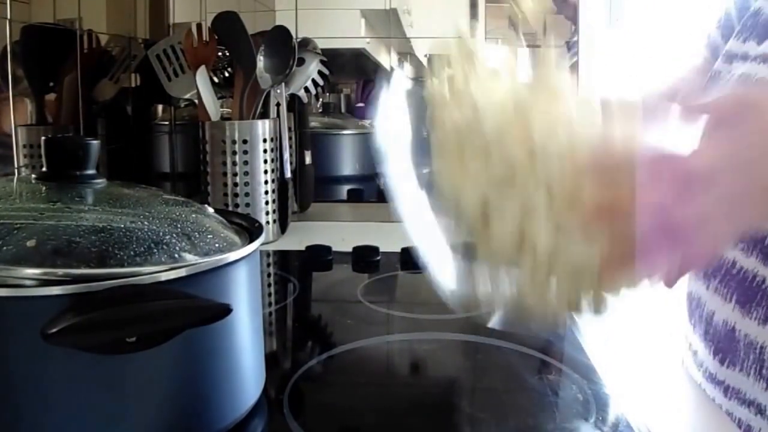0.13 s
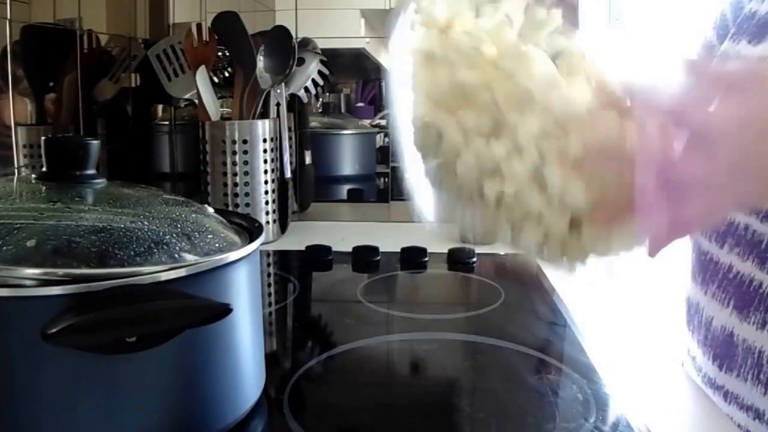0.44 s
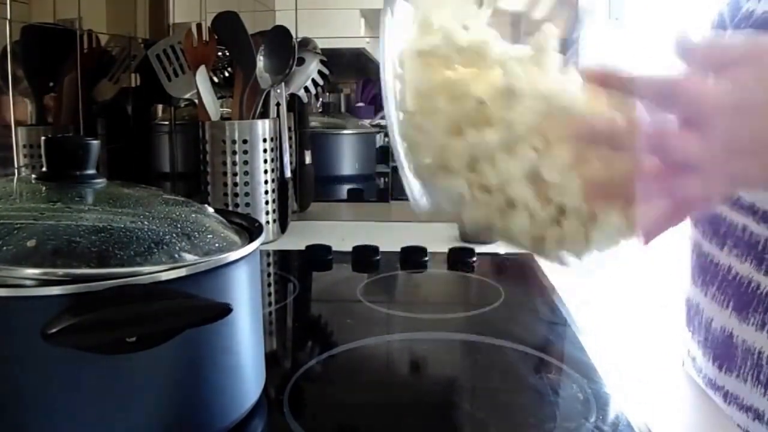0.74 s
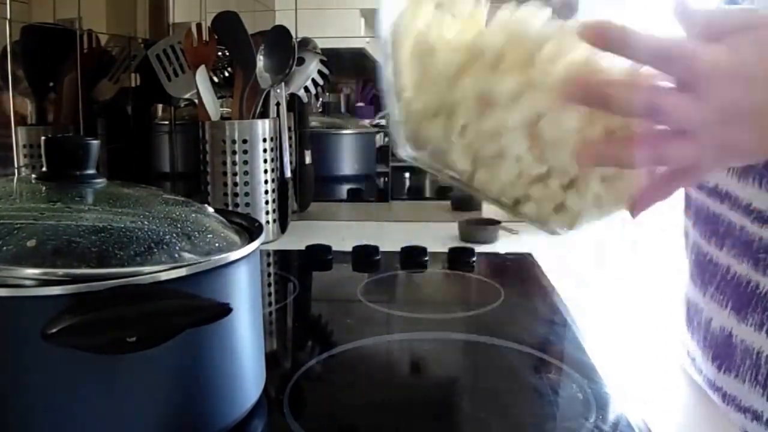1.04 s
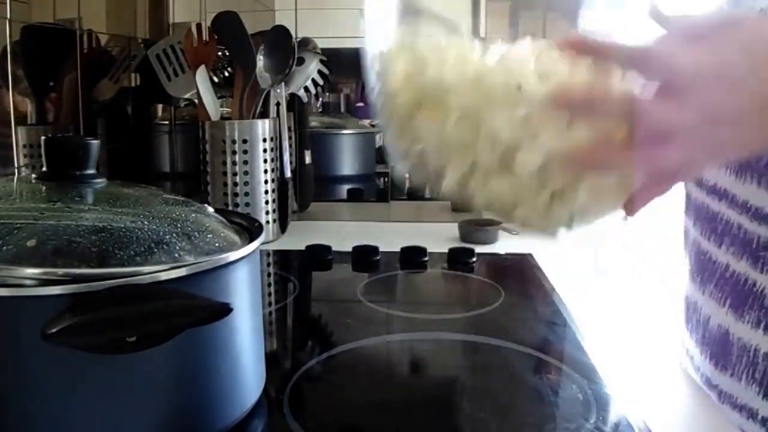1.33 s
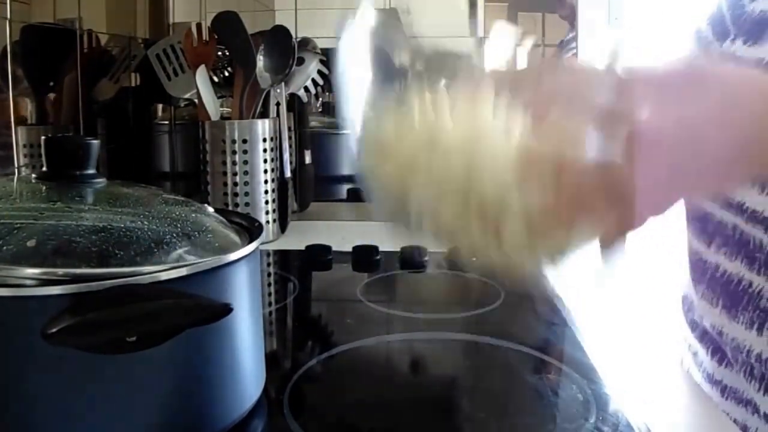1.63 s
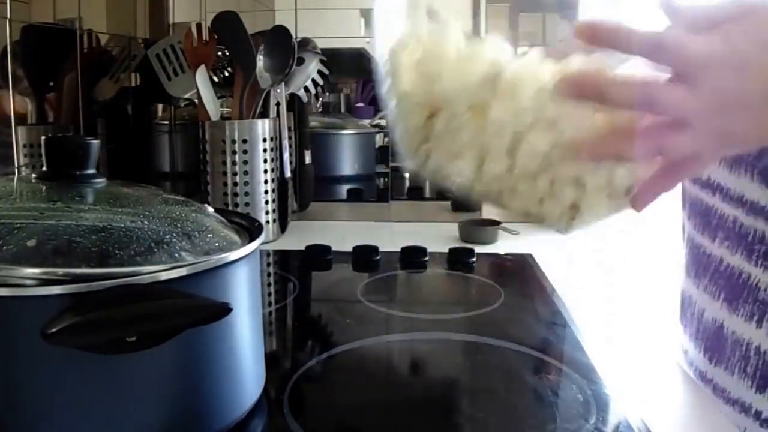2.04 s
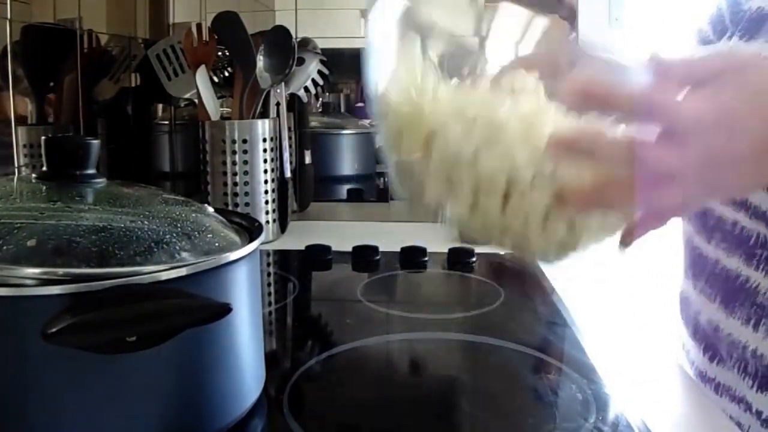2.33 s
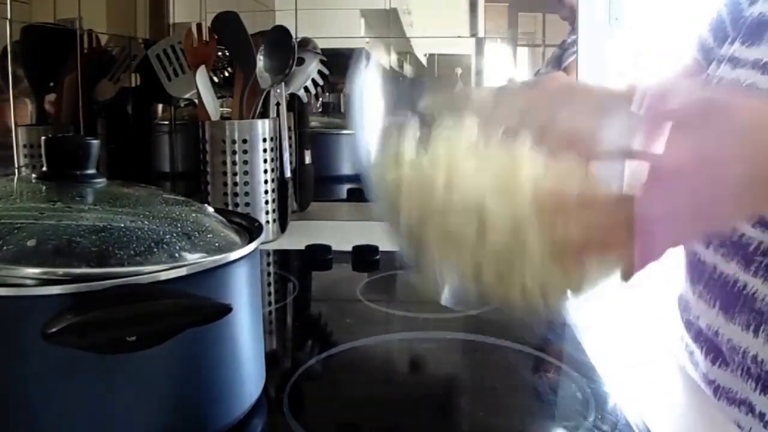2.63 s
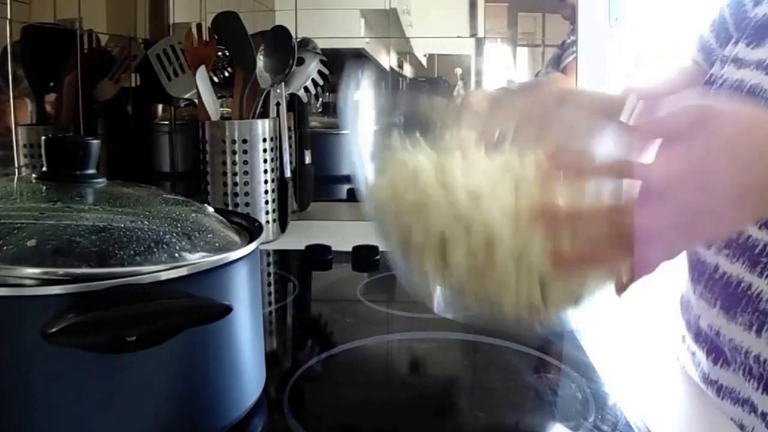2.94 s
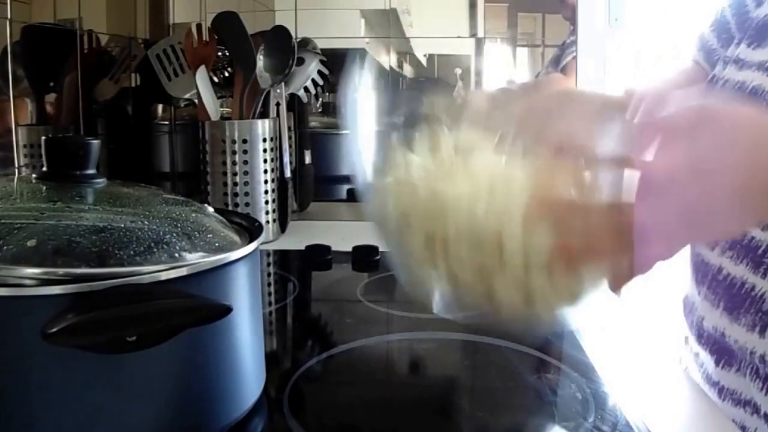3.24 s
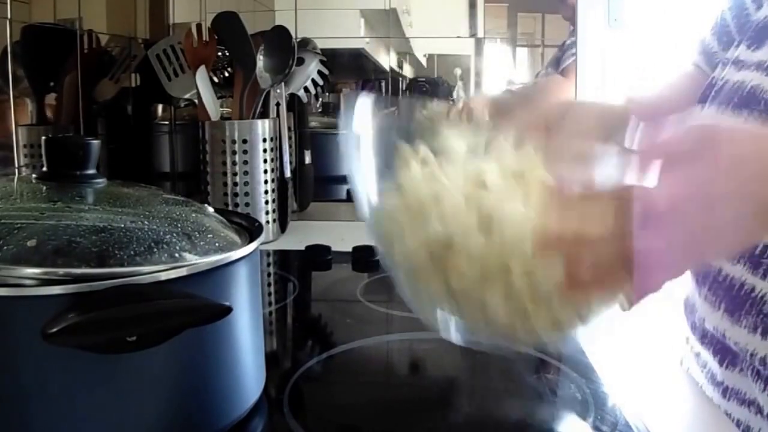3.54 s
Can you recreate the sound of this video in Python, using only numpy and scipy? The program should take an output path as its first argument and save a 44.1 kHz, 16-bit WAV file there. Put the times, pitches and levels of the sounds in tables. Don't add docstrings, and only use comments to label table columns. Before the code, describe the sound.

Popcorn is tossed in a large glass bowl, about every 0.33 s from 0.1 s to the end near 3.7 s. Each bright, grainy swish swells quickly and fades, with a duller heap landing just behind. Hard kernels clink sharply, strongest around 0.14, 0.52 and 1.18 s; dry ticks near 0.4 s. Swishes soften after 1.4 s, then recover somewhat around 3 s. Close, short kitchen echo, faint hum.

```python
import sys
import numpy as np
from scipy import signal
from scipy.fft import rfft, irfft
from scipy.io import wavfile

SR = 44100
rng = np.random.default_rng(int(sys.argv[2]) if len(sys.argv) > 2 else 0)


def ratio(d):
    e = np.asarray(d, float) / 20
    return 10 ** e


def bounce(signal):
    frames = np.transpose(np.atleast_2d(signal))
    limited = np.clip(frames, -1, 1)
    pcm = np.round(limited * 32767).astype(np.int16)
    wavfile.write(sys.argv[1], SR, pcm)


N = 163170
T = np.arange(N) / SR

# (start [s], rise [s], rustle level [dB], fall [dB/s], glass rattle level [dB])
TOSSES = [(0.099, 0.078, -25, 126, -34), (0.448, 0.068, -24, 123.5, -29.5), (0.778, 0.058, -27, 125, -31),
          (1.101, 0.064, -25.5, 130, -48), (1.448, 0.041, -33.5, 114, -40),
          (1.79, 0.077, -28.5, 112.5, -50), (2.118, 0.064, -28.5, 137, -38), (2.43, 0.09, -31.5, 146, -36),
          (2.768, 0.091, -29, 156, -34), (3.08, 0.07, -26, 160, -35), (3.381, 0.076, -27.5, 140, -35),
          (3.66, 0.1, -33, 120, -30)]
# (time [s], level [dB])
TRICKLE = [
    (0.0, -32.5),
    (0.17, -40.5),
    (0.35, -33),
    (1.17, -37.5),
    (1.47, -38.5),
    (1.63, -41.5),
    (1.96, -55),
    (2.31, -40),
    (3.16, -47),
    (3.7, -39),
]
# (frequency [Hz], density [dB/Hz])
RUSTLE_SPECTRUM = [(710, -18), (1200, -10.5), (1710, -7), (1850, -6.5), (2920, -9), (3590, -8), (4150, -8),
                   (14200, -6)]
# (frequency [Hz], density [dB/Hz])
SETTLE_SPECTRUM = [(1290, -35), (2200, -13), (2610, -13), (3510, -9), (4570, -9.5), (7690, -2),
                   (14100, -4.5)]
# (frequency [Hz], density [dB/Hz])
HEAP_SPECTRUM = [(180, -49), (300, -4.5), (560, -5.5), (793, -9), (1140, -1), (1480, -9.5), (1700, -1),
                 (2210, -27), (3740, -120)]
# (frequency [Hz], width [Hz], level [dB])
BOWL_CAVITY = [(470, 35, -7), (560, 70, -3), (1120, 80, -9)]
# (time [s], crack peak [dB], low pair [dB], middle modes [dB], upper pair [dB])
TAPS = [(0.1174, -17, -46, -40, -41), (0.1356, -9, -23.5, -20.5, -21), (0.1576, -20, -49, -20, -41),
        (0.2214, -15.5, -31.5, -32.5, -26), (0.4861, -24, -27, -40, -28), (0.5222, -6, -30, -17.5, -16.5),
        (0.7916, -16, -38, -43, -32), (0.8194, -16, -29, -34, -30), (0.847, -9.5, -50, -25, -22.5),
        (1.1074, -31, -36, -46, -54), (1.1238, -10.5, -32.5, -25, -37), (1.1498, -17, -23, -42, -30),
        (1.1752, -4, -60, -26.5, -24), (1.1994, -9, -29, -24, -27), (1.4745, -27, -41, -48, -45),
        (1.8108, -18.5, -34, -46, -39), (1.8494, -20, -34, -39, -36), (1.9334, -20, -40.5, -45, -22.5),
        (2.1605, -22, -36, -55.5, -42), (2.2694, -44, -38, -59, -53), (2.4914, -27, -37, -49, -51),
        (2.8115, -15.5, -36.5, -43, -28.5), (3.1188, -32, -32, -54, -48), (3.4331, -38, -55, -38, -52)]
# (frequency [Hz], level [dB], t60 [s])
LOW_MODES = [(1868, -13, .5), (1895, -9, .45), (1880, -3, .14), (1905, -4, .1), (1835, -9, .1),
             (1765, -16, .12), (1125, -19, .3)]
# (frequency [Hz], level [dB], t60 [s])
MIDDLE_MODES = [(3602, -7, .55), (3636, -10, .5), (3615, -2, .16), (3556, -10, .15)]
# (frequency [Hz], level [dB], t60 [s])
UPPER_MODES = [(4868, -17, .3), (4880, 0, .06), (4500, -5, .035), (4330, -8, .025)]
# (frequency [Hz], level [dB], t60 [s])
HIGH_MODES = [(6090, 2, .08), (6270, -1, .06), (6615, 2, .09), (6950, 0, .06), (7930, 1, .05),
              (9275, -3, .08), (9800, 0, .05), (10300, -1, .04), (12720, -3, .05)]
# (time [s], peak level [dB])
TICKS = [(0.3661, -18), (0.387, -5), (0.3954, -16), (0.4644, -19), (0.6644, -22), (0.7018, -19),
         (0.7692, -19), (0.9991, -21), (1.0194, -25), (1.0314, -22), (1.057, -20), (1.3808, -20),
         (1.4287, -22), (1.6531, -23)]
# (frequency [Hz], level [dB], t60 [s])
TICK_MODES = [(6100, -13, .003), (9400, -11, .004)]
# (frequency [Hz], density [dB/Hz])
HUM_SPECTRUM = [(12, -45), (20, -3), (549, -6), (967, -8), (1100, -4), (1300, -14.5), (1850, -8.5),
                (2190, -14.5), (3000, -19), (3900, -17), (6600, -120)]
# (frequency [Hz], width [Hz], level [dB])
HUM_TONES = [(96, 6.2, -74.5), (154, 6.9, -67.5), (213, 16, -77)]


def corn():
    level_db = np.transpose(TOSSES)[2]
    clumping = ratio(1.5 * drift(34.5))
    rustle = swell(0, level_db + 5) * clumping * colour(grains(9000, 1), RUSTLE_SPECTRUM)

    landing_lag_s, bowl_cut_hz = 0.0058, 430
    heap = colour(grains(3000, 2.6), HEAP_SPECTRUM)
    for hz, width_hz, db in BOWL_CAVITY:
        heap = heap + ratio(db) * peak(grains(3000, 2.7), hz, width_hz)
    heap = heap * swell(landing_lag_s, 0.77 * (level_db + 28) - 37, 0.9)
    heap = high(high(heap, bowl_cut_hz), bowl_cut_hz)

    trickle_db = np.interp(T, *np.transpose(TRICKLE)) - 3 + 0.81 * drift(17)
    trickle = ratio(trickle_db) * colour(grains(7000, 2.3), SETTLE_SPECTRUM)
    return rustle + heap + trickle


def glass():
    times, crack_db, low_db, middle_db, upper_db = np.transpose(TAPS)
    toss_db = np.transpose(TOSSES)[4]
    rattle_lead_s, earlier_ring_db = 0.024, -43.5
    soft = swell(-rattle_lead_s, (toss_db + 32) - 54.5, 1.69)
    hard = swell(-rattle_lead_s, 1.7 * (toss_db + 32) - 54.5, 1.69)
    # (modes, tap levels [dB], rattle level [dB], rattle gain over time)
    families = [(LOW_MODES, low_db + 3, -0.5, soft),
                (MIDDLE_MODES, middle_db - 1, -9.5, hard),
                (UPPER_MODES, upper_db - 1.5, -5, hard),
                (HIGH_MODES, 1.74 * crack_db + 6 - 21, -9, hard)]
    ringing = 0
    for modes, tap_db, rattle_db, rattle in families:
        for hz, mode_db, t60 in modes:
            uneven_db = rng.normal(0, 0.5, len(times))
            signs = rng.choice([-1, 1], len(times))
            strikes = at_times(times, ratio(tap_db + uneven_db) * signs)
            strikes[0] = ratio(earlier_ring_db + rattle_db)
            strikes = strikes + ratio(rattle_db) * rattle * grains(500, 2.5)
            damping = ratio(3.5 * drift(45))
            ringing = ringing + ratio(mode_db) * damping * ring(strikes, hz, t60)
    shimmer = fade(at_times(times, ratio(2 * crack_db - 23)), 0.061)
    ringing = ringing + shimmer * peak(rng.standard_normal(N), 6750, 1000)

    crack_s, crack_rise_s = 0.036, 0.0015
    burst = fade(at_times(times, ratio(1.15 * crack_db - 14)), crack_s)
    burst = fade(burst, crack_rise_s) / (crack_rise_s * SR)
    crack = burst * high(rng.standard_normal(N), 4900) * ratio(2.0 * drift(120))
    return high(ringing, 780) + crack


def stray_ticks():
    times, db = np.transpose(TICKS)
    lag_s, scuff_s = 0.0012, 0.0018
    clicks = at_times(times + lag_s, ratio(db + 5.5))
    rung = sum(ratio(mode_db) * ring(clicks, hz, t60) for hz, mode_db, t60 in TICK_MODES)
    scuff = ratio(-15) * fade(clicks, scuff_s) * rng.standard_normal(N)
    return high(high(clicks + rung + scuff, 4200), 2500)


def kitchen(x):
    t = np.arange(SR) / SR
    t60_s, build_up_s = 0.22, 0.0013
    white = rng.standard_normal(SR)
    dull = signal.lfilter([.5], [1, -.5], white)
    tail = dull * ratio(-60 * t / t60_s) + 1.8 * white * ratio(-110 * t)**(1 / t60_s)
    tail = tail * np.clip(t / build_up_s, 0, 1)
    return signal.fftconvolve(x, tail / np.sqrt(np.sum(tail ** 2)))[:N]


def room_hum():
    hum = ratio(-53) * colour(rng.standard_normal(N), HUM_SPECTRUM)
    for hz, width_hz, db in HUM_TONES:
        hum = hum + ratio(db) * peak(rng.standard_normal(N), hz, width_hz)
    return hum


def swell(shift_s, levels_db, follows=0.97):
    climb_db, round_s = 24, 0.019
    power = 0
    for (start, rise, _, fall, _), db in zip(TOSSES, levels_db):
        d = T - shift_s - start - rise
        bend = np.sqrt(d ** 2 + round_s ** 2)
        loss_db = (climb_db / rise * (bend - d) + fall * (bend + d)) / 2
        power = power + ratio(2 * (db - follows * loss_db))
    return np.sqrt(power)


def grains(per_s, spread_db):
    sizes = ratio(spread_db * np.minimum(rng.exponential(1, N), 5)) * rng.choice([-1, 1], N)
    return rms_one(sizes * (rng.random(N) < per_s / SR))


def at_times(times, gains):
    out = np.zeros(N)
    out[(np.asarray(times) * SR).astype(int)] = gains
    return out


def ring(clicks, hz, t60):
    r, w = ratio(-60 / (t60 * SR)), 2 * np.pi * hz / SR
    return signal.lfilter([0, np.sin(w)], [1, -2 * r * np.cos(w), r * r], clicks + 1e-18)


def fade(clicks, tau_s):
    return signal.lfilter([1], [1, -np.exp(-1 / (tau_s * SR))], clicks)


def drift(rate_hz):
    r = np.exp(-2 * np.pi * rate_hz / SR)
    return rms_one(signal.lfilter([1], [1, -2 * r, r * r], rng.standard_normal(N + SR))[SR:])


def colour(x, points):
    hz, db = np.transpose(points)
    f = np.log(np.maximum(np.fft.rfftfreq(N, 1 / SR), 1))
    outside = np.maximum(np.log(hz[0]) - f, 0) + np.maximum(f - np.log(hz[-1]), 0)
    gain_db = np.interp(f, np.log(hz), db) - 20 * outside
    return rms_one(irfft(rfft(x) * ratio(gain_db), N))


def peak(x, hz, width_hz):
    r = np.exp(-np.pi * width_hz / SR)
    w = 2 * np.pi * hz / SR
    return rms_one(signal.lfilter([1, 0, -1], [1, -2 * r * np.cos(w), r * r], x))


def high(x, hz):
    return signal.sosfilt(signal.butter(2, hz, "high", fs=SR, output="sos"), x)


def rms_one(x):
    return x / np.sqrt(np.mean(x ** 2) + 1e-20)


def scene():
    bowl = corn() + glass()
    stray = stray_ticks()
    echo = kitchen(ratio(-6) * bowl + ratio(-4) * stray)
    return (bowl + stray + echo + room_hum())[None]


def band_limit(x):
    return signal.sosfilt(signal.butter(12, 15310, fs=SR, output="sos"), x)


def record(dry):
    top_cut = signal.ellip(14, .3, 90, 14170, fs=SR, output="sos")
    mix = signal.sosfilt(top_cut, dry)
    return band_limit(mix)


dry = scene()
out = record(dry)
bounce(out)
```